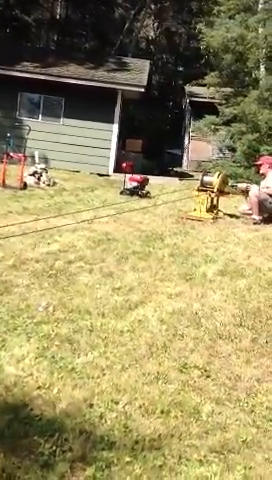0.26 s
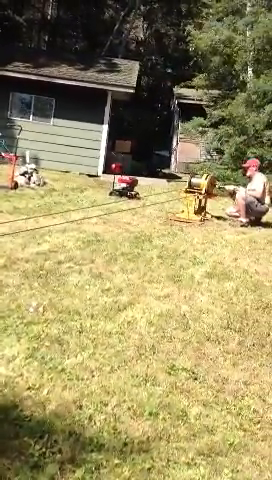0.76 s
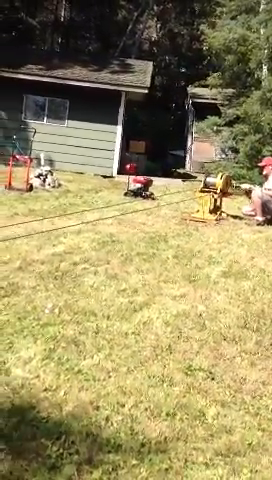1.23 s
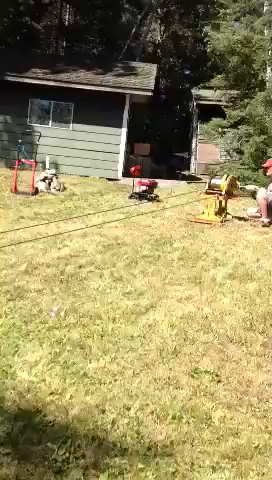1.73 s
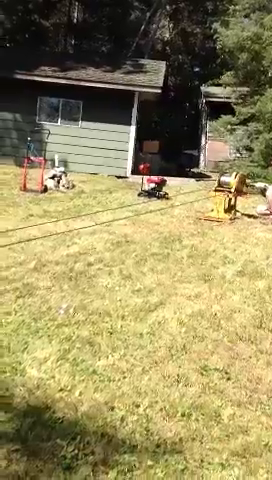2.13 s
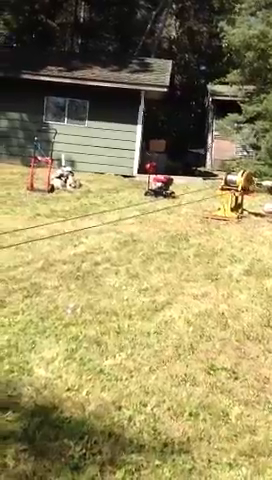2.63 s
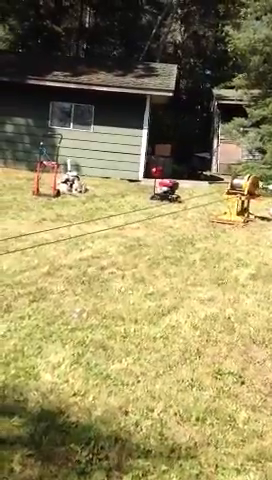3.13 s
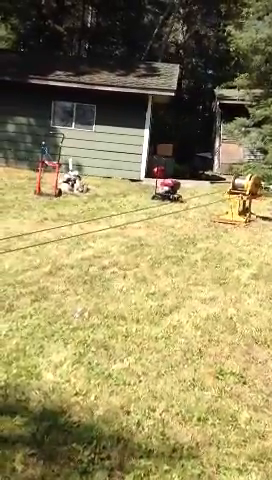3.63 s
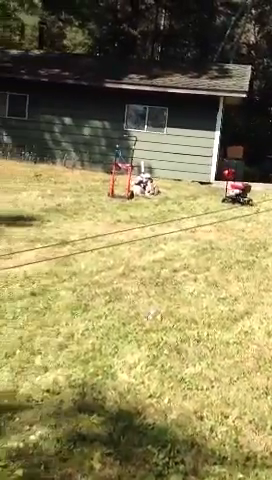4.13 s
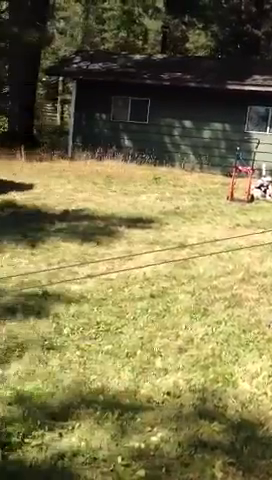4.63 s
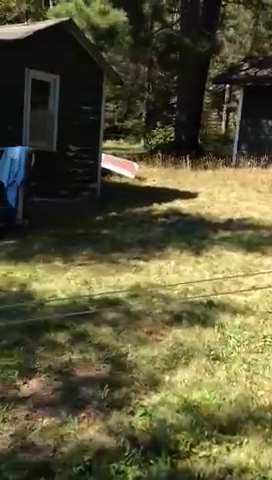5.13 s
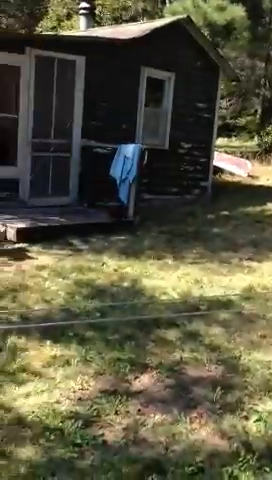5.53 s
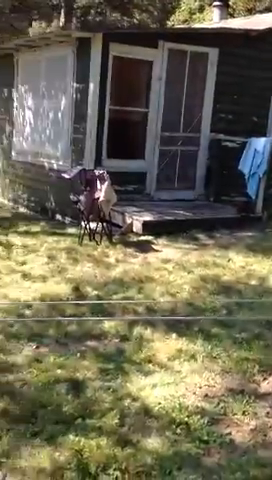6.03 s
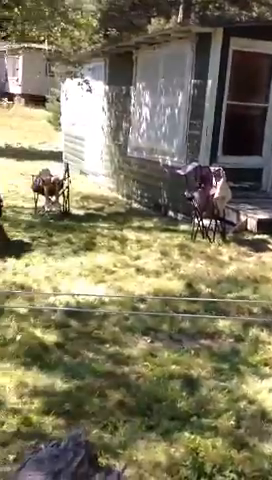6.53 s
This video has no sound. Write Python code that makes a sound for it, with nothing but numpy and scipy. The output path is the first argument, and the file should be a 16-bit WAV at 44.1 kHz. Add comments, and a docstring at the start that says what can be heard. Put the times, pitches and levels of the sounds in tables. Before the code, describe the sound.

Puttering single-cylinder motor, then a rattling steel ratchet and grinding gears speed up, hold steady, race higher and finally slow in an open yard.

```python
"""A four-stroke engine putters from the start: harmonics of its firing rate plus knocking, rough clatter.
At 0.46 s a geared rope winch starts: struck steel modes and noise cracks rattle as a pawl drops on a ratchet.
Gears grind and growl as filtered noise, whine and ring as wavering tones; the haul speeds up until 1.3 s.
It runs steadily to 4.8 s, then surges, fastest near 6.2 s; the gears bind at 6.08 s and the haul slows.
Sheds and trees return a short noise-tail echo of the winch; still air hums low throughout."""
import sys
import numpy as np
from scipy import signal
from scipy.fft import rfft, irfft
from scipy.io import wavfile
from scipy.ndimage import uniform_filter1d

SR = 44100
rng = np.random.default_rng(int(sys.argv[2]) if len(sys.argv) > 2 else 0)


def unload_wav(signal):
    """Save mono or channel-first audio to the path in sys.argv[1] as 16-bit WAV at rate SR, clipped to [-1, 1]."""
    wavfile.write(
        sys.argv[1],
        SR,
        np.round(np.clip(np.atleast_2d(signal).T, -1, 1) * 32767).astype(np.int16),
    )


N = 298557
TIME_S = np.arange(N) / SR


def undb(db):
    """Amplitude ratio of a level in dB."""
    return 10 ** (np.asarray(db) / 20)


def level(x, db):
    """Scale to an rms level."""
    return x * undb(db) / np.sqrt(np.mean(x ** 2))


def curves(table):
    """Each column of a time table, interpolated at every sample."""
    time_s, *columns = np.transpose(table)
    return [np.interp(TIME_S, time_s, column) for column in columns]


def bump(at_s, length_s):
    """Gaussian swell of peak 1; length_s from the peak to 1/e."""
    return np.exp(-((TIME_S - at_s) / length_s) ** 2)


def noise():
    """White noise of unit spread."""
    return rng.standard_normal(N)


def walk(rate_hz):
    """Smooth random wander with a spread near 1."""
    hold = int(SR / rate_hz)
    steps = np.repeat(rng.standard_normal(N // hold + 1), hold)
    return 1.31 * uniform_filter1d(steps, hold)[:N]


def colour(x, points, size=4096):
    """Minimum-phase filter through (frequency [Hz], gain [dB]) points."""
    hz, db = np.transpose(points)
    grid_hz = np.maximum(np.fft.rfftfreq(size, 1 / SR), 1)
    gain = undb(np.interp(np.log(grid_hz), np.log(hz), db))
    cepstrum = irfft(np.log(gain))
    # fold onto positive time: causal response
    cepstrum[1:size // 2] *= 2
    cepstrum[size // 2 + 1:] = 0
    response = irfft(np.exp(rfft(cepstrum)))
    return signal.oaconvolve(x, response)[:N]


def impulses(times_s, sizes):
    """One impulse at each time."""
    samples = np.clip(times_s * SR, 0, N).astype(int)
    return np.bincount(samples, sizes, N + 1)[:N]


def decay_per_sample(t60_s):
    """Amplitude factor per sample for a 60 dB decay in t60_s."""
    return np.exp(-np.log(1000) / (t60_s * SR))


def ring(x, hz, t60_s):
    """One decaying mode; small steel parts radiate no bass."""
    r, w = decay_per_sample(t60_s), 2 * np.pi * hz / SR
    return signal.lfilter([1, -1], [1, -2 * r * np.cos(w), r * r], x + 1e-18)


def fade(x, t60_s):
    """Exponential envelope after each impulse."""
    return signal.lfilter([1], [1, -decay_per_sample(t60_s)], x + 1e-18)


# spectrum of still air over the lawn: (frequency [Hz], relative level [dB])
AIR_SPECTRUM = [(20, -12), (60, 0.5), (110, -2), (200, 19.5), (400, -5), (1000, -11), (4000, -25)]


def still_air():
    """Steady noise, strongest near 200 Hz."""
    return level(colour(noise(), AIR_SPECTRUM), -51.5)


def yard(x, t60_s=0.99, wet_db=-13):
    """Walls and trees scatter a thin, dull echo: a coloured noise tail after 20 ms."""
    tail = noise() * undb(-60 * TIME_S / t60_s) * (TIME_S > .02)
    tail = colour(tail, [(200, -5.0), (1000, 2), (5000, 2.5), (14000, -13)])[:SR]
    echo = signal.oaconvolve(x, tail / np.linalg.norm(tail))[:N]
    return x + undb(wet_db) * echo


# load steps on the engine: (time [s], firing rate lost [Hz])
LOAD_SAGS = [(.48, .85), (1.08, .75), (1.65, .5), (4.97, .7), (5.87, .65)]
GOVERNED_HZ = 30  # firings
SAG_S, RECOVER_S, OVERSHOOT_RATIO = .11, .35, .5


def governor():
    """Firing rate: settles after the start, dips at each load, overshoots on recovery."""
    rate_hz = GOVERNED_HZ + .6 * bump(0, .25)
    for at_s, lost_hz in LOAD_SAGS:
        overshoot = OVERSHOOT_RATIO * bump(at_s + RECOVER_S, SAG_S)
        rate_hz = rate_hz - lost_hz * (bump(at_s, SAG_S) - overshoot)
    return rate_hz


# exhaust note: (multiple of firing rate [1], relative level [dB])
EXHAUST_HARMONICS = [(2, -21), (4, 8), (5, 15.5), (6, -22), (7, -0.5), (8, 3.5), (9, 1), (10, 2.5),
                     (12, -11), (13, -5), (14, -8), (15, -9), (17, -9.5), (20, -9), (22, -9), (23, -15),
                     (25, -13), (26, -6.5), (34, -3), (37, -10)]


def exhaust(cycle, boom_db, bark_db, second_at_cycle=.37, second_size=0.57):
    """Two thumps a cycle, exhaust and intake, set the phases; the muffler smears upper harmonics."""
    boom, bark = 0, 0
    for k, db in EXHAUST_HARMONICS:
        thumps_rad = np.angle(1 + second_size * np.exp(-2j * np.pi * k * second_at_cycle))
        smear_rad = rng.standard_normal() * (k / 16) ** 2
        gain = undb(db + min(k / 8, 3) * walk(9))
        partial = gain * np.cos(2 * np.pi * k * cycle + thumps_rad + smear_rad)
        if k <= 6:
            boom = boom + partial
        else:
            bark = bark + partial
    return level(boom, 0) * undb(boom_db) + level(bark, 0.17) * undb(bark_db)


# engine: (time [s], boom of low harmonics [dB], bark of upper harmonics before +0.17 [dB])
ENGINE_LEVELS = [(0, -39, -38.5), (.25, -40, -40), (.45, -41, -43.5), (.75, -39, -41), (1.08, -42.5, -44),
                 (1.25, -38, -39.5), (1.7, -40.5, -41), (4.7, -41, -41), (4.97, -41.5, -44.5),
                 (5.35, -40.5, -39.5), (5.85, -42.5, -41.5), (6.77, -43.5, -40)]
# valve gear and cooling fan: (frequency [Hz], relative level [dB])
CLATTER_SPECTRUM = [(70, -39.5), (130, -9.5), (200, 1.5), (330, -8.5), (480, -11.5), (620, -3),
                    (860, -10.5), (1100, -8.5), (1600, -2.5), (2400, -7), (4800, -6), (7600, -12.5),
                    (14000, -15.5)]


def engine():
    """One cylinder putters through its muffler while the valve gear clatters."""
    rate_hz, (boom_db, bark_db) = governor(), curves(ENGINE_LEVELS)
    cycle = np.cumsum(rate_hz) / SR - .12
    fired_s = np.interp(np.arange(int(cycle[-1]) + 1), cycle, TIME_S)
    firings = impulses(fired_s, undb(0.83 * rng.standard_normal(len(fired_s))))
    # two crank turns a firing; every turn shakes the valve gear, most on the power stroke
    turn_db = 2.0 * np.cos(2 * np.pi * 2 * cycle)
    stroke_db = 1.2 * np.cos(2 * np.pi * (cycle - .3))
    shake = undb(turn_db + stroke_db + 0.74 * walk(40))
    # one noise burst repeats with every firing; the rest is rough
    knocks = signal.oaconvolve(firings, rng.standard_normal(SR // 30))[:N]
    knocks = colour(knocks, [(400, -9.5), (1100, 0.5), (2000, -0.5), (5000, -9.5)])
    rough = undb(-4.5) * noise()
    clatter = colour((knocks + rough) * shake * undb(0.12 * bark_db), CLATTER_SPECTRUM)
    return exhaust(cycle, boom_db, bark_db) + level(clatter, -34.0)


# haul speed: (time [s], ratchet teeth per second [Hz])
HAUL_SPEED = [(.45, 16.23), (.76, 25.44), (.9, 26.16), (1.07, 39.8), (1.32, 45.79), (1.6, 38.26),
              (1.97, 35.32), (2.31, 33.48), (2.86, 34.16), (3.4, 33.59), (3.72, 33.32), (4.29, 31.93),
              (4.84, 30.68), (4.88, 36.13), (5.13, 46.2), (5.38, 49.76), (5.41, 39.68), (5.56, 43.84),
              (5.64, 37.47), (6.06, 49.67), (6.16, 51.11), (6.46, 41.15), (6.79, 35.32)]
START_S = .463


def haul():
    """Ratchet speed in teeth per second, and teeth passed since the start."""
    speed_hz, = curves(HAUL_SPEED)
    teeth = np.cumsum(speed_hz) / SR
    return speed_hz, teeth - np.interp(START_S, TIME_S, teeth)


SWELL_TEETH, FIRST_SWELL_TEETH = 9.35, 4.2  # swell period and first peak, in ratchet teeth
BIND_S, BIND_LENGTH_S, BIND_DB = 6.08, .06, 5.5  # gears bind once under extra load


def big_gear(speed_hz, teeth, hz=1852, drift_hz=11, swell_db=4.5, speed_power=.7, gear_db=-39.0):
    """One low mode of the big gear, rubbed into swells as it turns and boosted where it binds."""
    swell = np.cos(2 * np.pi * (teeth - FIRST_SWELL_TEETH) / SWELL_TEETH)
    bind_db = BIND_DB * bump(BIND_S, BIND_LENGTH_S)
    force = speed_hz ** speed_power * undb(swell_db * swell + bind_db + 3.3 * walk(60))
    cycles = np.cumsum(hz + drift_hz * walk(90)) / SR
    return level(force * np.sin(2 * np.pi * cycles), gear_db)


# grinding teeth: (frequency [Hz], relative level [dB])
GRIND_SPECTRUM = [(150, -50), (700, -18), (1200, -19), (1800, -3), (2700, -4), (3500, -3.5), (5000, -3.5),
                  (8000, -10.5), (12000, -12), (13500, -24)]
# frame growl: (frequency [Hz], relative level [dB])
GROWL_SPECTRUM = [(70, -44), (300, -7.5), (480, -10.5), (650, 1.5), (760, 4), (880, -4.5), (1030, 1),
                  (1280, 6), (1500, -19.5), (2200, -16), (6000, -24)]
# frame strains as the engine takes up load: (time [s], length [s], extra growl [dB])
FRAME_STRAINS = [(1.15, .17, 2), (5.2, 0.39, 2)]


def gears(whine_db=-44, grind_db=-32, speed_power=0.31, growl_db=-41.5, growl_power=0.53):
    """Teeth grind and whine with ratchet speed; the frame growls more as the haul speeds up."""
    speed_hz, teeth = haul()
    mesh_hz = 60 * speed_hz  # 60 meshes a ratchet tooth
    turning = np.clip((TIME_S - START_S) / 0.43, 0, 1)
    whine_cycles = np.cumsum(mesh_hz * (1 + 0.0043 * walk(60))) / SR
    whine = np.sin(2 * np.pi * whine_cycles) * undb(3.2 * walk(25))
    grind = colour(noise() * undb(2.0 * walk(150)), GRIND_SPECTRUM) * speed_hz ** speed_power
    strain_db = sum(db * bump(at_s, length_s) for at_s, length_s, db in FRAME_STRAINS)
    growl = colour(noise() * undb(1.8 * walk(60) + strain_db), GROWL_SPECTRUM)
    growl = growl * speed_hz ** growl_power
    mix = level(grind, grind_db) + level(whine, whine_db) + level(growl, growl_db)
    return turning * (mix + big_gear(speed_hz, teeth))


# pawl drops: (time [s], relative level [dB], extra brightness [dB])
PAWL_DROPS = [(.46, -15, -3.5), (1.15, -19, 1), (1.6, -20.5, 0.5), (2.2, -18.5, 1.5), (2.9, -17.5, -0.5),
              (3.6, -18.5, 1), (4.3, -18.5, 0.5), (4.8, -20, -0.5), (5.3, -21.5, 2), (6.1, -21.5, -0.5),
              (6.77, -20.5, 0)]
# teeth that catch and drop the pawl harder: (time [s], peak extra level [dB])
PAWL_CATCHES = [(1.031, 3), (1.897, 4), (4.275, 5)]
# dry crack of each drop: (frequency [Hz], relative level [dB])
CRACK_SPECTRUM = [(100, -44), (1000, -27), (2500, 5), (4000, -11), (6000, 2.5), (7800, 2), (10000, 2),
                  (12400, -8), (13600, -18), (14500, -10), (15300, -25)]
# steel modes of pawl and ratchet wheel: (frequency [Hz], rms level [dB], t60 [s])
STEEL_MODES = [(2934, -42.5, 0.14), (3724, -34.5, 0.24), (3963, -35.5, 0.061), (4790, -40, 0.25),
               (5005, -39.5, .1), (6055, -35.5, 0.094), (6178, -38, 0.024), (7241, -38.5, 0.13),
               (7420, -45.5, .07), (8466, -41, 0.081), (9910, -48.5, .036), (11290, -41, .11),
               (12520, -37, 0.048), (12800, -46, 0.12), (14570, -36.5, .043), (14570, -35.5, 0.049)]
WHEEL_TEETH, LOUDEST_TOOTH = 14, 1
CRUISE_HZ = 34  # teeth per second on the steady haul
LAG_S = 0.0018  # delay of the highest modes


def ratchet(scatter_db=1.33, rebound_s=.0028, rebound_size=0.46, uneven_db=1.57, jitter_s=.0004,
            turn_db=2, speed_db=3.5):
    """Each tooth drops the pawl: it cracks, rebounds and rings the steel, never twice quite alike."""
    speed_hz, teeth = haul()
    drop_db, bright_db = curves(PAWL_DROPS)
    times_s = np.interp(np.arange(int(teeth[-1]) + 1), teeth, TIME_S)
    late, uneven = rng.standard_normal((len(times_s), 2)).T
    drop_db = drop_db + sum(extra_db * bump(at_s, .01) for at_s, extra_db in PAWL_CATCHES)
    blow_db = np.interp(times_s, TIME_S, drop_db) + uneven_db * uneven
    times_s = times_s + jitter_s * late
    # low modes grow with speed and swell once a wheel turn
    wheel_db = speed_db * np.log2(speed_hz / CRUISE_HZ)
    wheel_db = wheel_db + turn_db * np.cos(2 * np.pi * (teeth - LOUDEST_TOOTH) / WHEEL_TEETH)
    blows = impulses(times_s, undb(blow_db))
    contact = noise() * (fade(blows, t60_s=0.0064) + undb(-4.0) * fade(blows, t60_s=0.11))
    out = level(colour(contact * undb(bright_db / 2), CRACK_SPECTRUM), -35.5)
    for hz, mode_db, t60_s in STEEL_MODES:
        delay, scatter, bounce = rng.standard_normal((len(times_s), 3)).T
        force = undb(0.55 * blow_db + scatter_db * scatter)
        # the blow takes a moment to spread; the highest modes speak last
        struck_s = times_s + (LAG_S if hz > 12000 else 0)
        strikes = impulses(struck_s + .0005 * np.abs(delay), force)
        rebound_at_s = struck_s + rebound_s * np.exp(.3 * bounce)
        strikes = strikes + impulses(rebound_at_s, rebound_size * force)
        seat_db = wheel_db if hz < 5500 else bright_db
        struck = strikes * undb(seat_db + 0.6 * walk(5.5))
        out = out + level(ring(struck, hz, t60_s), mode_db)
    return out


def scene():
    """Air and engine dry, winch with the yard echo; one channel."""
    return (still_air() + engine() + yard(gears() + ratchet()))[None]


TOP_HZ = 15100


def record(dry):
    """Steep elliptic low-pass at TOP_HZ."""
    return signal.sosfilt(signal.ellip(8, .2, 80, TOP_HZ, fs=SR, output="sos"), dry)


dry = scene()
out = record(dry)
unload_wav(out)
```